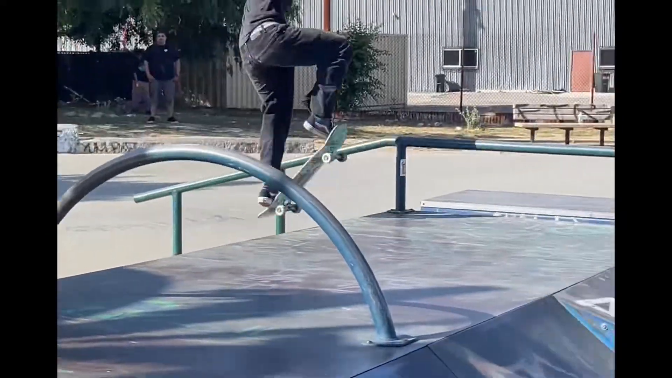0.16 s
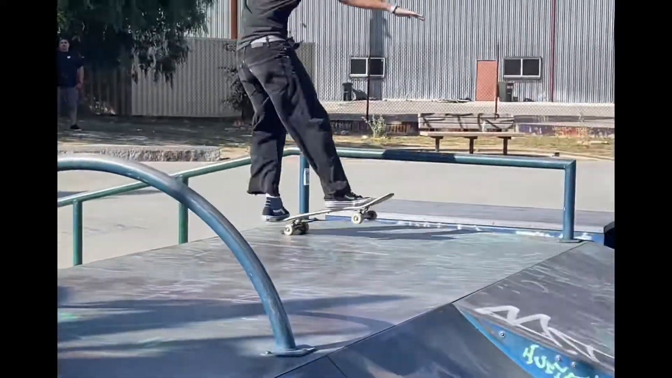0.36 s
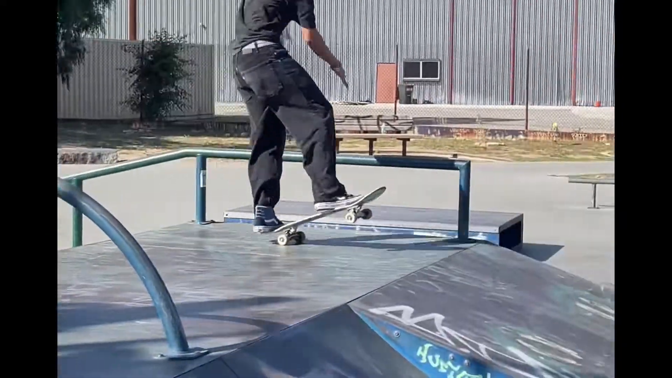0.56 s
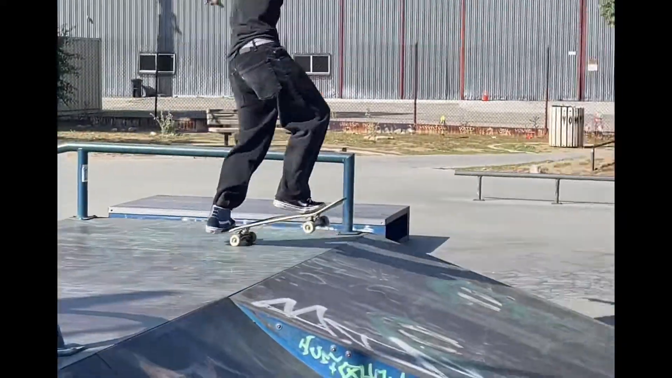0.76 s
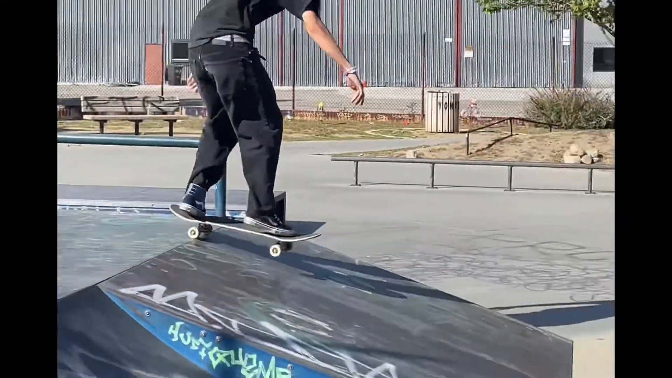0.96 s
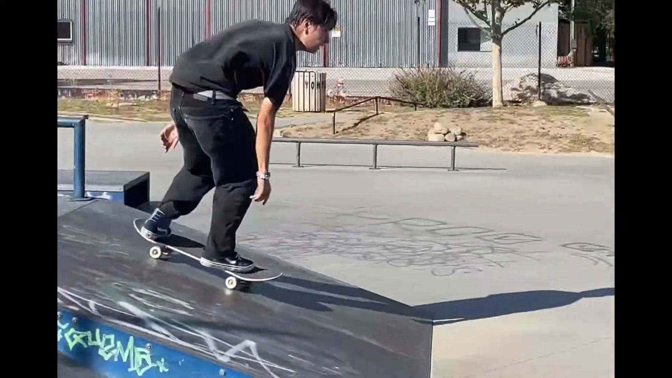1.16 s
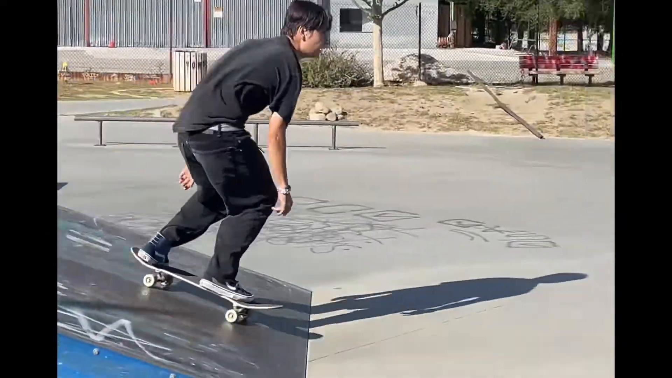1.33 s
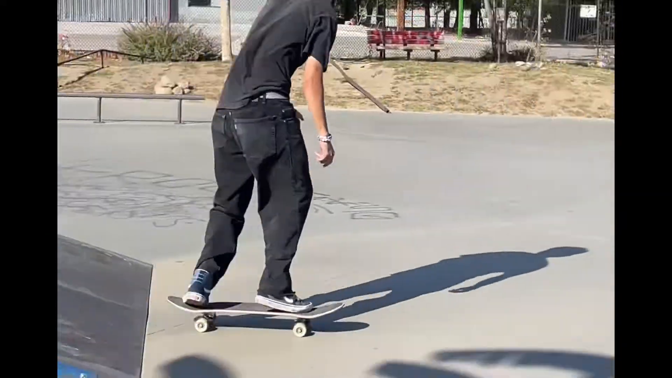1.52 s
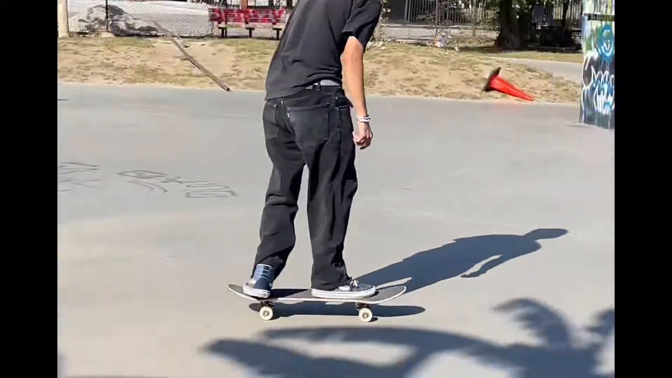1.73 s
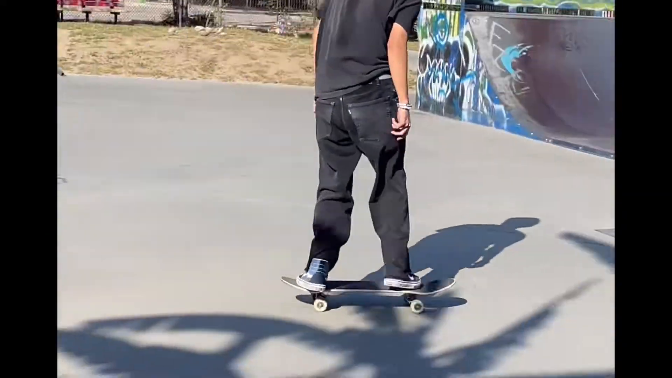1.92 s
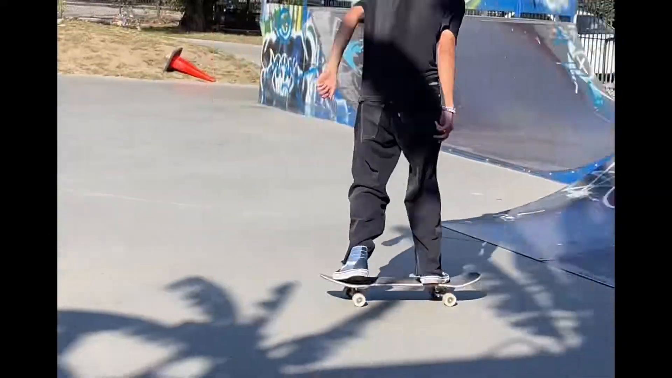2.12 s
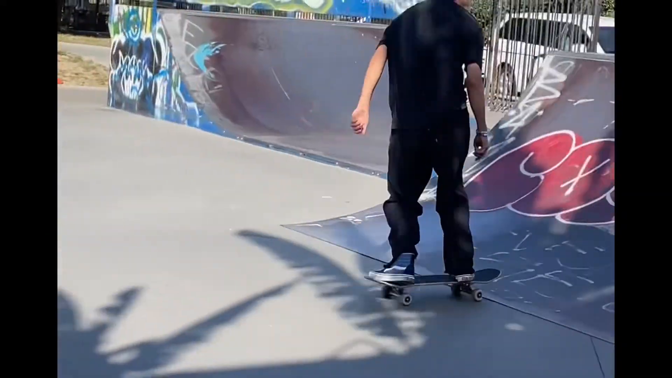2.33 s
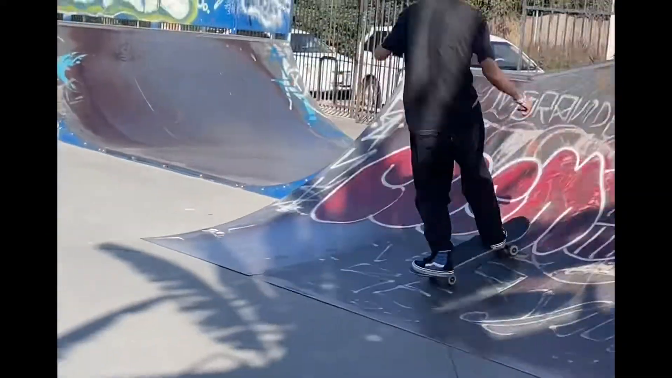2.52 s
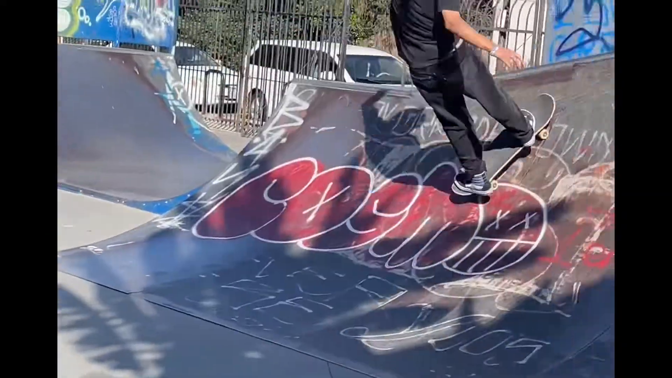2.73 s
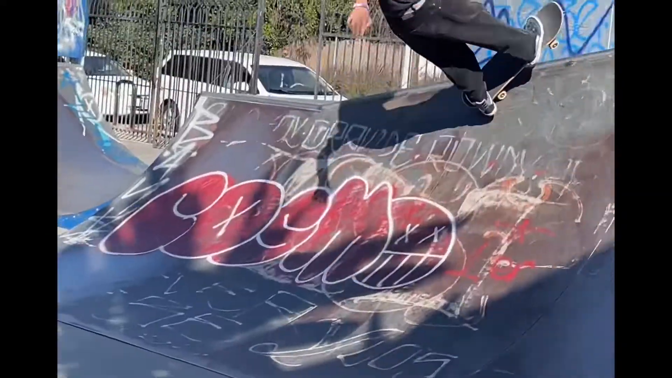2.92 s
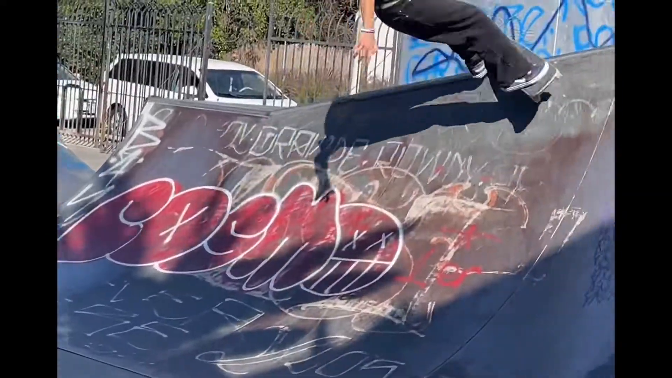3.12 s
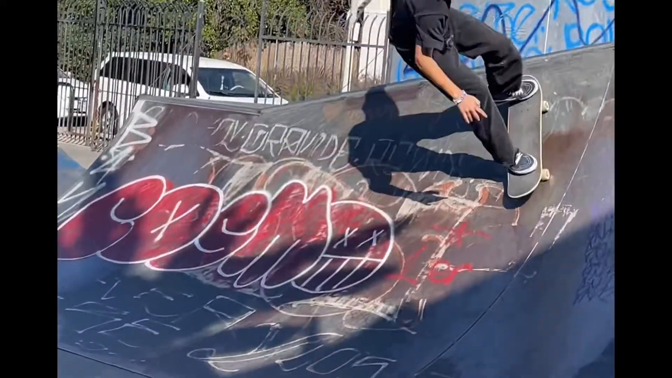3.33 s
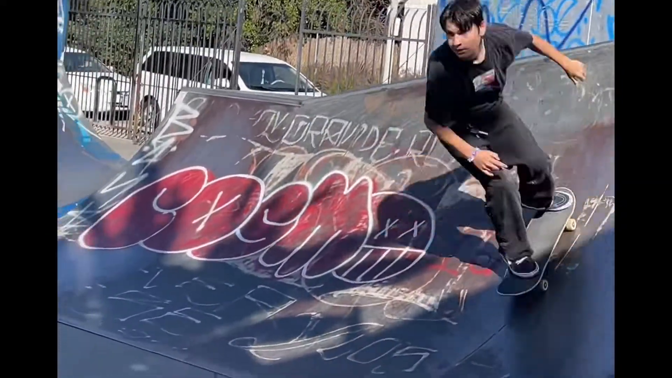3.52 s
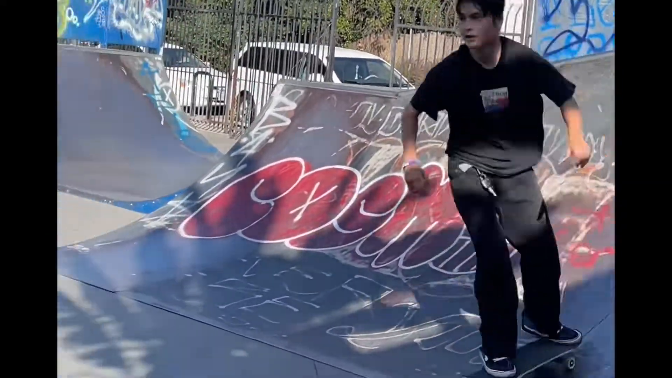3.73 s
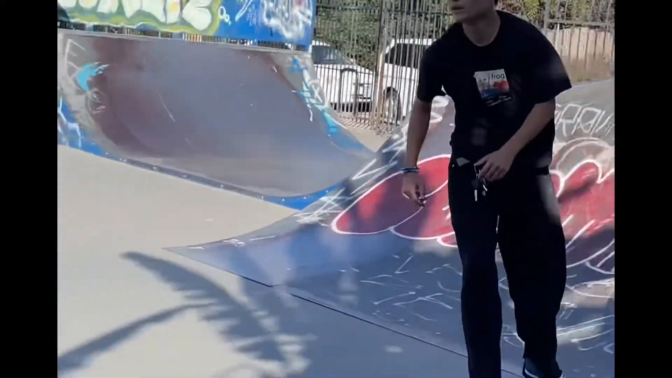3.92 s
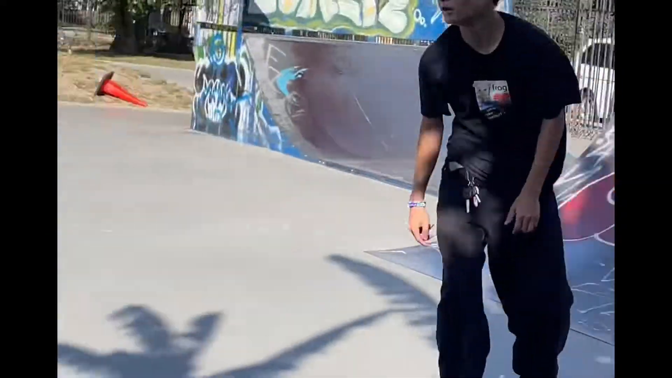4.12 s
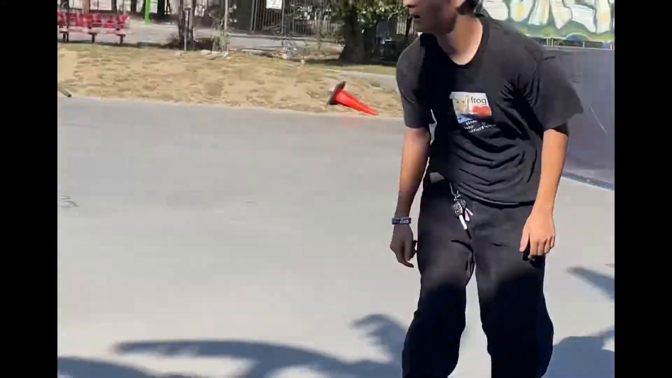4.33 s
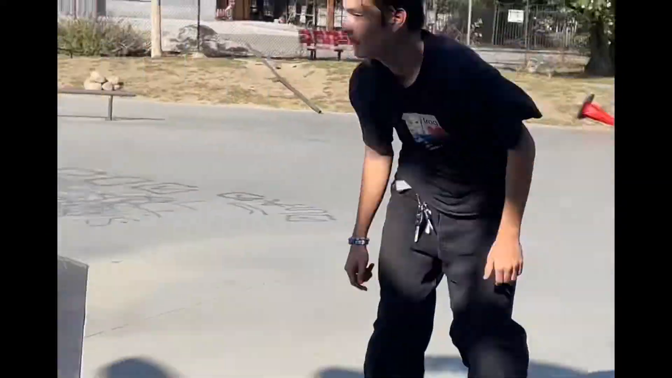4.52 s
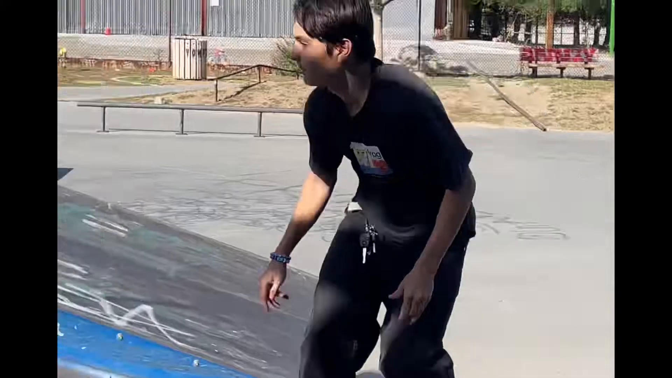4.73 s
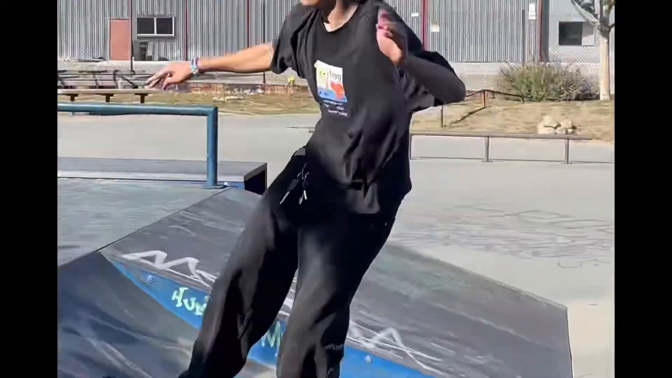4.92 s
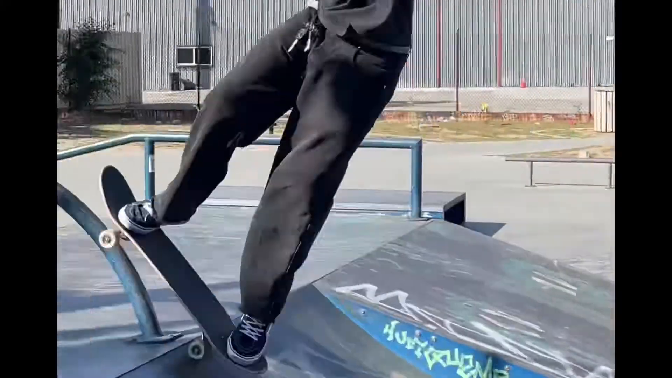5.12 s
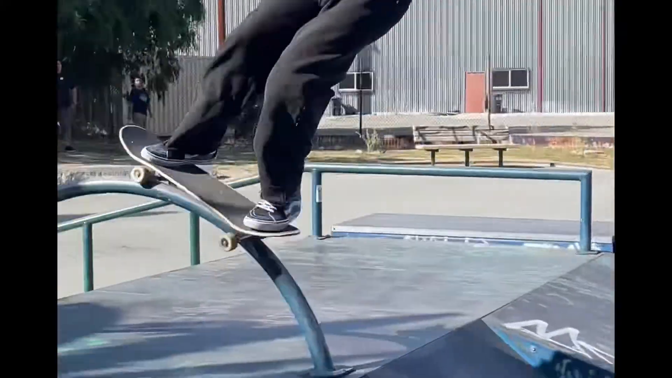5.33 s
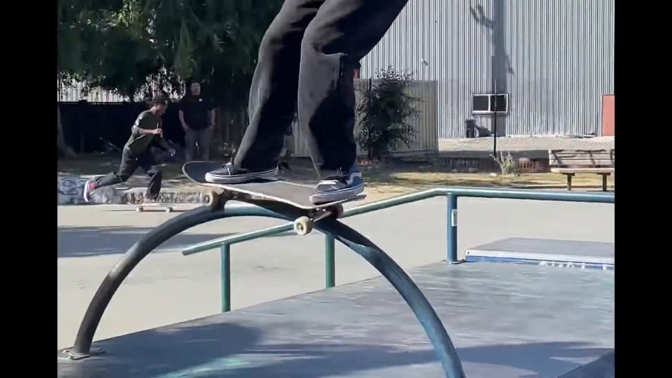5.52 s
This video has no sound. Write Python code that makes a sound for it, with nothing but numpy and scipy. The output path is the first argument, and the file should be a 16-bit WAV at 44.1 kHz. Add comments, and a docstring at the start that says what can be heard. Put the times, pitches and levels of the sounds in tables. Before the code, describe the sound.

A skateboard is heard close up in an open skatepark. Low hollow rumbling and small scrapes start it, then a sharp landing clack at 0.33 s with quick rattles. Quieter rolling leads to a firm knock at 1.03 s and a tight pair of clacks at 1.42 and 1.5 s as the wheels leave the ramp. On concrete the roll becomes a grainy roar with wavering, singing tones and a brief low deck hum. At 2.37 to 2.46 s the wheels clatter onto a curved ramp; hollow rolling and scrapes build to a bright, hard slap at 3.28 s. Light ticks at 3.8 to 3.9 s return it to softer concrete rolling, its whine rising towards a heavy rattling bang at 4.76 s and another at 4.83 s. A loud metallic clank at 5.2 s strikes the rail, with smaller knocks and ringing until the end. Short dull echoes follow the blows.

```python
"""Skateboard wheels roll close by over hollow steel-faced ramps and concrete in an open skatepark.
Filtered noise and random contacts make their rumble, drone, roar and hiss; wavering tones make them sing.
The deck hums briefly. Wheels, trucks and tail strike edges: each blow is a rattling burst through resonances,
with short dying tones for firm knocks and longer ones for a rail. Blows, knocks and rail echo off the park.
"""
import sys
import numpy as np
from scipy import signal
from scipy.fft import rfft, irfft, next_fast_len
from scipy.io import wavfile

SR = 44100
rng = np.random.default_rng(int(sys.argv[2]) if len(sys.argv) > 2 else 0)


def int16_out(signal):
    """Quantize to a 16-bit WAV file."""
    q = np.round(np.clip(np.atleast_2d(signal).T, -1, 1) * 32767)
    wavfile.write(sys.argv[1], SR, q.astype(np.int16))


N = 249606
TIME = np.arange(N) / SR   # s

# How hard the wheels work the surface
# [t/s, ground shake level/dB, load on the hollow ramps level/dB, grip of the wheels level/dB]
ROLLING_LEVELS = [ (0.0, -22, -28, -50), (0.32, -26.5, -39.5, -55), (0.5, -26, -25.5, -59),
                  (0.66, -34.5, -36.5, -56.5), (1.03, -36, -39.5, -58), (1.2, -25, -26, -54),
                  (1.35, -28.5, -31, -44.5), (1.62, -34, -29, -45.5), (1.9, -30.5, -36.5, -49.5),
                  (2.15, -34.5, -39.5, -50.5), (2.34, -35.5, -38, -47), (2.54, -58, -25, -36),
                  (2.63, -41, -28, -41), (2.85, -37, -23, -37), (3.02, -28, -28, -43.5),
                  (3.25, -38, -28.5, -42.5), (3.36, -29.5, -24, -31), (3.6, -43, -31.5, -41.5),
                  (3.9, -43, -32.5, -41), (4.3, -42.5, -41.5, -51), (4.55, -49, -42, -48),
                  (4.74, -38, -39.5, -46), (4.93, -52, -23, -48), (5.35, -28.5, -28, -52),
                  (5.66, -31.5, -38.5, -51)]
# Tone colour of each rolling sound, loudness per Hz of pitch range [f/Hz, level/dB per Hz]
SHAKE_COLOUR = [(15, -37.5), (36, -14), (50, 5), (63, -2.5), (82, 8.5), (120, -10), (300, -100)]
RUMBLE_COLOUR = [(25, -81), (65, -28), (100, -1), (160, 0), (220, -1.5), (300, -8.5), (420, -16.5),
                 (600, -39.5), (1500, -100)]
DRONE_COLOUR = [(100, -68.5), (230, -7), (320, 0.5), (450, -1.5), (620, 0), (850, -5), (1100, -10.5),
                (1600, -49.5), (4000, -100)]
ROAR_COLOUR = [(300, -78.5), (800, -5.5), (1150, -0.5), (1480, -3), (1750, -5.5), (2150, -10.5),
               (2400, -18), (5000, -96.5)]
GRIT_COLOUR = [(400, -56.5), (1200, -32.5), (2000, -2), (2600, 3.5), (3400, 2.5), (4500, -1), (5800, -2.5),
               (7200, -9), (9000, -6), (11300, -14), (13400, -25), (15200, -21)]
DRONE_DB, DRONE_FOLLOWS_GRIP = -1, 0.12   # dB, share: the deck drone mostly follows the load
ROAR_DB, ROAR_FOLLOWS_GRIP = -5, 0.38   # dB, share: the wheel roar follows the load more than the grip

# When the wheels are on flat concrete [start t/s, end t/s]
CONCRETE_SPANS = [(1.5, 2.36), (3.9, 4.76)]
CONCRETE_ROAR_DB, CONCRETE_GROWS_S = 1.5, 0.28   # the roar swells after the wheels reach it

# Tones the wheels sing on concrete [f/Hz, width f/Hz, level/dB]
WHEEL_TONES = [(860, 70, -5), (1160, 90, -4), (1400, 130, 2), (1620, 160, 0), (2030, 240, -5)]
# The singing swells and climbs before each ramp [t/s, pitch as a multiple, level/dB]
SINGING_COURSE = [(1.6, 1.0, 0.5), (1.9, 1.02, 1.5), (2.15, 1.03, 1.5), (2.36, 1.03, 2.5), (4.1, .97, -2),
                  (4.4, 1.0, 2), (4.55, 1.04, 3), (4.75, 1.09, 5)]
WHEEL_SING_DB = -5.0   # against the roar
SING_WANDERS, SING_SWELLS_DB = 0.02, 2.5   # typical wander as a share of the pitch; swell of each tone

# The deck hums on its bending mode after leaving the ramp
# [t/s, pitch f/Hz, first partial level/dB, second partial level/dB]
DECK_HUM = [(1.48, 119.1, -44, -39), (1.5, 123.2, -25, -35), (1.55, 119.5, -31, -42),
            (1.634, 111.1, -23.5, -23), (1.738, 110.9, -26.5, -56), (1.798, 114.2, -28.5, -34),
            (1.872, 98.7, -31.5, -54), (1.95, 117, -39, -33.5)]

# Blows on ramp lips, coping and rail; t60 is the time to fall by 60 dB
# [t/s, knock on the deck level/dB, clank of steel level/dB, weight on the ramp level/dB,
#  rattle t60/s, ring f/Hz, ring level/dB]
BLOW_LIST = [ (0.003, -33, -38.5, -21.5, 0.058, 1100, -45), (0.085, -32, -31, -48, 0.083, 2240, -61),
             (0.164, -39, -37, -37, 0.077, 5700, -42.5), (0.255, -31, -33, -36, 0.022, 1960, -29.5),
             (0.329, -9.5, -23, -16.5, 0.066, 2620, -13), (0.346, -22.5, -35.5, -15, 0.3, 2340, -33.5),
             (0.372, -25, -34, -21, 0.064, 2800, -33), (0.402, -32, -41, -23, 0.075, 2400, -37),
             (0.432, -29.5, -45, -26, 0.068, 1590, -38), (0.945, -40, -44, -43, 0.02, 4500, -48),
             (0.995, -41, -44, -42, 0.03, 4530, -47), (1.032, -11, -24.5, -11, 0.11, 2120, -15.5),
             (1.048, -24, -32, -11, 0.064, 1880, -19.5), (1.06, -26, -44, -31, 0.12, 2790, -16),
             (1.08, -27.5, -54, -19, 0.51, 2550, -31), (1.42, -18.5, -34, -10, 0.021, 1600, -45),
             (1.429, -27.5, -32, -18.5, 0.13, 2940, -48), (1.496, -12.5, -16.5, -8, 0.019, 1415, -19.5),
             (1.505, -25.5, -33, -17, 0.18, 2720, -35), (1.715, -43, -54, -36, 0.069, 2930, -41),
             (1.795, -45, -46, -43, 0.08, 2970, -44), (2.365, -14, -15, -11.5, 0.13, 2940, -12.5),
             (2.388, -18, -18, -37.5, 0.17, 3220, -31), (2.405, -20, -29, -28, 0.057, 3400, -14),
             (2.443, -22.5, -17.5, -24, 0.18, 2750, -24), (2.458, -18.5, -19, -16.5, 0.18, 3380, -19.5),
             (2.845, -20, -34.5, -31, 0.048, 2080, -36), (2.883, -26.5, -26.5, -13, 0.044, 5060, -26),
             (2.956, -24, -45, -12, 0.028, 2180, -34), (3.012, -30, -23.5, -20.5, 0.16, 3450, -29),
             (3.175, -25.5, -33, -22.5, 0.079, 2360, -36), (3.203, -35, -45, -24, 0.035, 2000, -37),
             (3.244, -19.5, -46, -27, 0.036, 1690, -34), (3.261, -24, -41, -40, 0.066, 1600, -29),
             (3.277, -9.5, -15, -14.5, 0.043, 2970, -16), (3.316, -37, -37, -15.5, 0.1, 1160, -27),
             (3.811, -25.5, -33, -23, 0.036, 2130, -35), (3.884, -17.5, -27, -28, 0.042, 1600, -23),
             (4.76, -17.5, -12.5, -16.5, 0.22, 2940, -18.5), (4.833, -18.5, -20, -16.5, 0.27, 2380, -19.5),
             (4.867, -42, -17.5, -28, 0.07, 2820, -40), (5.144, -28, -32, -18, 0.023, 5700, -32),
             (5.195, -13.5, -9, -23, 0.1, 3170, -23), (5.229, -20, -20.5, -24, 0.17, 2340, -46),
             (5.258, -25.5, -28, -21, 0.21, 3200, -25.5), (5.326, -23.5, -38, -26, 0.14, 1420, -31),
             (5.377, -32.5, -39.5, -24.5, 0.2, 1580, -36), (5.482, -22, -21.5, -24, 0.077, 1470, -24.5),
             (5.508, -25, -34, -25.5, 0.11, 2000, -40)]
# Dense steel modes, then the sizzle above them [f/Hz, level/dB per Hz]
STEEL_COLOUR = [(300, -69), (1200, -17.5), (1900, 3), (2700, 3), (3400, 2), (4200, -5.5), (5200, -5),
                (7000, -31.5), (12000, -57)]
SIZZLE_COLOUR = [(1500, -65), (4300, -15), (5800, 9), (7200, 6.5), (9500, 10.5), (11500, -26),
                 (13400, -3.5), (15200, -1.5)]
# Resonances of the deck, the ramp panels and the hollow ramp box [f/Hz, width f/Hz, level/dB]
DECK_MODES = [(681, 210, -1), (817, 131, 4.5), (1062, 406, 4), (1236, 695, 3), (1672, 595, -2)]
PANEL_MODES = [(262, 81, 1), (346.5, 78, 4.5), (393, 78, 3), (542, 78, 2.5), (567, 207, -4.5)]
BOX_MODES = [(49.6, 13, -11.5), (87.4, 12.2, 4.5), (119, 49, 1.5), (156, 42, 0), (220.2, 24, -2.5)]
BODY_OUTLASTS = 2.3   # the panels shake this many times longer than the loose parts rattle
BOOM_DB, THUMP_DB, SIZZLE_DB = -1.5, -3.5, -6.5   # each part against what drives it
SIZZLE_FOLLOWS_KNOCK, THUMP_FOLLOWS_KNOCK = 0.52, 0.16   # shares
RING_WIDTH = 0.085   # share of the ring pitch
# The last ramp sounds by its panels more than its box
LAST_RAMP_S, LAST_RAMP_BOOM_DB, LAST_RAMP_THUMP_DB = 4.7, -5, 5

# Firm dry knocks where wheels, trucks or tail meet an edge squarely
# [t/s, starting level/dB, f/Hz, t60/s]
KNOCK_LIST = [ (0.084, -20, 2240, .02), (0.2555, -26, 1930, .015), (0.330, -10, 525, .03),
              (0.330, -11, 1015, .025), (0.331, -11, 1465, .02), (0.343, -12, 1160, .03),
              (0.345, -17, 2360, .03), (0.356, -9, 350, .05), (0.358, -15, 970, .025),
              (0.371, -11, 645, .04), (0.373, -19, 1240, .03), (0.401, -14, 540, .04),
              (0.431, -20, 1190, .03), (1.0335, -5, 480, .025), (1.0418, -13, 3020, .03),
              (1.0635, -14, 2950, .04), (1.0827, -14, 2990, .04), (1.096, -19, 2850, .03),
              (1.112, -21, 2900, .025), (1.4203, -9, 1300, .01), (1.4203, -13, 1800, .012),
              (1.429, -14, 1500, .015), (1.4215, -7, 560, .016), (1.4275, -5, 620, .025),
              (1.4335, -7, 450, .016), (1.496, -7, 1500, .008), (1.4965, -8, 720, .014),
              (1.488, -11, 160, .06), (1.503, -8, 170, .06), (1.5075, -10, 880, .016),
              (1.516, -25, 2950, .07), (2.3665, -9, 850, .02), (2.368, -9, 2550, .03),
              (2.37, -10, 3300, .03), (2.4445, -13, 2700, .02), (2.4445, -14, 4300, .012),
              (2.956, -11, 1520, .022), (2.9575, -17, 850, .015), (3.013, -14, 3450, .02),
              (3.2425, -21, 1700, .04), (3.261, -20, 1680, .035), (3.277, -5, 3500, .018),
              (3.2795, -4, 1630, .02), (3.2805, -6, 700, .016), (3.283, -10, 190, .06),
              (3.319, -12, 1250, .016), (3.2035, -16, 1220, .022), (3.808, -21, 1500, .015),
              (3.808, -19, 2250, .012), (3.883, -16, 1250, .01), (3.883, -17, 650, .015),
              (4.7605, -7, 390, .06), (4.7605, -8, 3450, .03), (4.775, -10, 360, .05),
              (4.787, -11, 330, .04), (4.805, -12, 360, .05), (4.887, -10, 330, .04),
              (5.1945, -7, 1370, .035), (5.195, -11, 2880, .03), (5.197, -5, 500, .045),
              (5.229, -9, 490, .045), (5.26, -10, 330, .05), (5.483, -16, 2020, .035),
              (5.486, -21, 1050, .04), (5.52, -25, 2020, .05)]

# Ringing modes of the rail tube [f/Hz, level/dB, t60/s]
RAIL_MODES = [(495, -1, .3), (800, -1, .25), (1141, -8, .2), (2024, -10, .15), (3195, -7, .45),
              (3272, -20, 1.5)]
# Strikes on the rail [t/s, level/dB]
RAIL_STRIKES = [(5.195, -25), (5.257, -29), (5.33, -33), (5.483, -36)]

# Phase gap between left and right by frequency [f/Hz, left leads by/radians]
STEREO_PHASE = [(100, 0.0), (2150, 0.15), (2760, 0.8), (3620, 0.1), (5000, 0.1), (6290, 1.5), (7240, 2.0),
                (8700, 2.5), (9300, 3.0), (9910, 3.14), (13700, 3.14), (14300, 3.5), (15200, 3.9),
                (16500, 4.4)]
# Scattered sound that differs between left and right [f/Hz, level/dB]
STEREO_SCATTER = [(60, -55.5), (140, -55.5), (300, -18), (700, -10.5), (2000, -18), (4200, -51.5),
                  (6500, -7), (10000, -37), (13300, -29), (15000, -17.5)]
CUTOFF_HZ = 15750


def amp(db):
    """Turn decibels into a multiplier for the waveform."""
    return 10 ** (np.asarray(db) / 20)


def rms_one(x):
    """Scale a sound to an average strength (rms) of 1."""
    return x / np.sqrt(np.mean(x ** 2) + 1e-20)


def blend(a_db, b_db, share):
    """Mix two levels: follow b by the share and a by the rest."""
    return a_db + np.clip(share, 0, 1) * (b_db - a_db)


def at_hz(points, hz):
    """Read a spectrum between its points on a log-frequency axis."""
    points = np.array(points)
    return np.interp(np.log(hz + 1), np.log(points[:, 0]), points[:, 1])


def drift(rate):
    """Wander slowly by chance with spread 1, turning about rate times a second."""
    steps = rng.standard_normal(4000)
    # 1.22 makes up for the spread lost between the steps
    return np.interp(2 * rate * TIME, np.arange(len(steps)), 1.22 * steps)


def coloured(x, spectrum):
    """Filter x to a spectrum with no sound ahead of its cause (minimum phase); white noise keeps its rms."""
    level_db = at_hz(spectrum, np.linspace(0, SR / 2, 4097))
    cepstrum = irfft(np.log(amp(level_db)))
    cepstrum[1:4096] *= 2   # folds the response forward in time
    pulse = irfft(np.exp(rfft(cepstrum[:4097], 8192)))
    pulse = pulse / np.sqrt(np.sum(pulse ** 2))
    return signal.fftconvolve(x, pulse)[:len(x)]


def resonances(x, modes):
    """Ring side-by-side resonances with alternating signs; white noise keeps its rms."""
    probe = np.zeros(4096)
    probe[0] = 1   # a single click shows the filter's overall gain
    out, pulse = 0, 0
    for k, (hz, width, level_db) in enumerate(modes):
        r = np.exp(-np.pi * max(width, 5) / SR)   # a narrower resonance rings longer
        b = (-1) ** k * amp(level_db) * (1 - r * r) / 2 * np.array([1, 0, -1])
        a = [1, -2 * r * np.cos(2 * np.pi * hz / SR), r * r]
        out = out + signal.lfilter(b, a, x + 1e-18)
        pulse = pulse + signal.lfilter(b, a, probe)
    return out / np.sqrt(np.sum(pulse ** 2))


def grains(per_s, spread_db):
    """Make random tiny contacts of uneven size and either sign, with rms 1."""
    sizes = amp(spread_db * np.minimum(rng.exponential(1, N), 4))
    sizes = sizes * rng.choice([-1, 1], N)
    return rms_one(sizes * (rng.random(N) < per_s / SR))


def rolling():
    """Surface roughness shakes ground, ramp box, deck and wheel urethane; bumps make the sound flicker."""
    s, *levels = np.transpose(ROLLING_LEVELS)
    shake_db, rumble_db, grit_db = [np.interp(TIME, s, level) for level in levels]
    drone_db = DRONE_DB + blend(rumble_db, grit_db, DRONE_FOLLOWS_GRIP)
    roar_db = ROAR_DB + blend(rumble_db, grit_db, ROAR_FOLLOWS_GRIP)

    # 0 off the concrete, growing to 1 on it
    solid = np.zeros(N)
    for start, end in CONCRETE_SPANS:
        solid += np.clip((TIME - start) / CONCRETE_GROWS_S, 0, 1) * (TIME < end)
    roar_db = roar_db + CONCRETE_ROAR_DB * solid

    bumps = drift(18)   # shared by all the layers but the ground shake and the singing
    shake_gain = amp(shake_db + 0.88 * drift(13))
    shake = shake_gain * coloured(rng.standard_normal(N), SHAKE_COLOUR)
    rumble_gain = amp(rumble_db + 0.26 * bumps + 1.57 * drift(25))
    rumble = rumble_gain * coloured(rng.standard_normal(N), RUMBLE_COLOUR)
    drone_gain = amp(drone_db + 0.36 * bumps + 0.66 * drift(40))
    drone = drone_gain * coloured(grains(4000, spread_db=3.5), DRONE_COLOUR)
    roar_gain = amp(roar_db + 0.28 * bumps + 0.84 * drift(50))
    roar = roar_gain * coloured(grains(2500, spread_db=1.5), ROAR_COLOUR)
    grit_gain = amp(grit_db + 0.7 * bumps + 0.8 * drift(60))
    grit = grit_gain * coloured(grains(9000, spread_db=1.5), GRIT_COLOUR)
    sing = solid * amp(roar_db + WHEEL_SING_DB) * wheel_sing()
    return shake + rumble + drone + roar + grit + sing


def wheel_sing():
    """Tread and bearings give rough narrow tones that wander in pitch and swell one by one."""
    s, pitch, swell_db = np.transpose(SINGING_COURSE)
    out = 0
    for hz, width, level_db in WHEEL_TONES:
        wandering_pitch = np.interp(TIME, s, pitch) + SING_WANDERS * drift(2)
        turn = 2 * np.pi * hz * np.cumsum(wandering_pitch) / SR
        swell = amp(level_db + SING_SWELLS_DB * drift(2.5))
        out = out + swell * drift(width) * np.sin(turn)   # the fast drift roughens the tone
    return out * amp(np.interp(TIME, s, swell_db))


def hum():
    """The deck bends to and fro: two wavering partials, one at twice the pitch, fade in and out."""
    s, hz, first_db, second_db = np.transpose(DECK_HUM)
    turn = 2 * np.pi * np.cumsum(np.interp(TIME, s, hz)) / SR
    gate = np.clip(np.minimum(TIME - s[0], s[-1] - TIME) / 0.04, 0, 1)   # 0.04 s fades
    first_gain = amp(np.interp(TIME, s, first_db) + 2.0 * drift(12))
    first = first_gain * np.sin(turn + 0.5 * drift(10))
    second_gain = amp(np.interp(TIME, s, second_db) + 9.8 * drift(6.0))
    second = second_gain * np.sin(2 * turn + 0.82 * drift(22.0))
    return np.sqrt(2) * gate * (first + second)


def shaking(levels_db, t60s, rise_s):
    """Follow the strength of shaking: each blow rises quickly and dies away; energies add."""
    power = np.zeros(N)
    for (s, *_), level_db, t60 in zip(BLOW_LIST, levels_db, t60s):
        i = max(round((s - rise_s) * SR), 0)
        t = np.arange(min(N - i, SR)) / SR
        rise = np.minimum(t / rise_s, 1)
        power[i:i + SR] += (amp(level_db - 60 * t / max(t60, 0.01)) * rise) ** 2
    return np.sqrt(power)


def blows():
    """Loose wheels, washers and sheet rattle on after a blow and feed steel, deck, panels and ramp box."""
    s, knock_db, clank_db, weight_db, rattle_t60, ring_hz, ring_db = np.transpose(BLOW_LIST)
    last_ramp = s > LAST_RAMP_S
    body_t60 = BODY_OUTLASTS * rattle_t60
    deck_t60 = np.sqrt(np.abs(rattle_t60 * body_t60))   # between the rattle and the panels
    boom_db = BOOM_DB + weight_db + LAST_RAMP_BOOM_DB * last_ramp
    thump_db = THUMP_DB + blend(weight_db, knock_db, THUMP_FOLLOWS_KNOCK)
    thump_db = thump_db + LAST_RAMP_THUMP_DB * last_ramp
    sizzle_db = SIZZLE_DB + blend(clank_db, knock_db, SIZZLE_FOLLOWS_KNOCK)

    rattle = grains(12000, spread_db=0.5) * amp(0.89 * drift(150))
    knocks = grains(3000, spread_db=1.5)
    first = np.round(s * SR).astype(int)
    rattle[first], knocks[first] = amp(-10.0), amp(9.5)   # the first contact is one set click

    out = coloured(rattle * shaking(clank_db, rattle_t60, 0.0025), STEEL_COLOUR)
    out += coloured(rattle * shaking(sizzle_db, 0.98 * rattle_t60, 0.00098), SIZZLE_COLOUR)
    out += resonances(rattle * shaking(knock_db, deck_t60, 0.0042), DECK_MODES)
    out += resonances(knocks * shaking(thump_db, body_t60, 0.0071), PANEL_MODES)
    out += resonances(rng.standard_normal(N) * shaking(boom_db, 1.08 * body_t60, 0.0041), BOX_MODES)

    # The part struck rings at its own pitch
    t = np.arange(SR // 4) / SR
    for at, t60, hz, level_db in zip(first, rattle_t60, ring_hz, ring_db):
        fade = amp(level_db - 60 * t / max(t60, 0.01))[:N - at]
        drive = rattle[at:at + len(t)] * fade
        out[at:at + len(t)] += resonances(drive, [(hz, RING_WIDTH * hz, 0)])
    return out


def firm_knocks():
    """The part struck gives a short dying tone, damped at once by the rider's weight."""
    out, t = np.zeros(N + SR), np.arange(SR // 10) / SR
    for s, level_db, hz, t60 in KNOCK_LIST:
        at = round(s * SR)
        pitch = hz * rng.normal(1, 0.015)
        out[at:at + len(t)] += amp(level_db - 60 * t / t60) * np.sin(2 * np.pi * pitch * t)
    return out[:N]


def rail():
    """The truck strikes the rail; its tube modes ring on, roughened as the board rubs along it."""
    out = np.zeros(N)
    for hz, level_db, t60 in RAIL_MODES:
        waver, slip = amp(3.0 * drift(30)), 0.6 * drift(35)
        for s, hit_db in RAIL_STRIKES:
            t = np.maximum(TIME - s, 0)
            start_db = hit_db + level_db + rng.normal(0, 1)
            ring = np.sin(2 * np.pi * hz * t + slip)
            out += (t > 0) * waver * amp(start_db - 60 * t / t60) * ring
    return out


def park(x):
    """Ramps, fences and a shed wall return dull scattered echoes, made by a fading noise tail."""
    t = np.arange(SR // 2) / SR
    tail = rng.standard_normal(len(t)) * amp(-60 * t / 0.54) * (t > 0.012)
    tail = signal.lfilter([1], [1, -0.6], tail)   # dulls the treble
    return signal.fftconvolve(x, tail / np.sqrt(np.sum(tail ** 2)))[:N]


def scene():
    """All sources are spread to left and right by a phase gap and an unlike scattered share."""
    struck = blows() + firm_knocks() + rail()
    sound = rolling() + hum() + struck + amp(-16.0) * park(struck)

    size = next_fast_len(N + 4096)
    hz = np.arange(size // 2 + 1) * SR / size
    phase = np.array(STEREO_PHASE)
    half_gap = np.exp(1j * np.interp(hz, phase[:, 0], phase[:, 1]) / 2)
    whole = rfft(sound, size)

    t = np.arange(3000) / SR
    scatter = rng.standard_normal(len(t)) * amp(-60 * t / 0.11)
    scatter = scatter / np.sqrt(np.sum(scatter ** 2))
    unlike = rfft(scatter, size) * amp(at_hz(STEREO_SCATTER, hz))
    scattered = irfft(whole * unlike, size)[:N] * drift(12)   # wanders in strength and sign

    left_right = irfft([whole * half_gap, whole / half_gap], size)[:, :N]
    return left_right + scattered * [[1], [-1]]   # opposite signs left and right


def record(dry):
    """Cut the lowest bass, round the peaks, then cut the top."""
    bass_cut = signal.butter(2, 30, "high", fs=SR, output="sos")
    top_cut = signal.cheby1(10, 0.5, CUTOFF_HZ, fs=SR, output="sos")
    rounded = 1.2 * np.tanh(signal.sosfilt(bass_cut, dry) / 1.2)
    return signal.sosfilt(top_cut, rounded)


dry = scene()
out = record(dry)
int16_out(out)
```